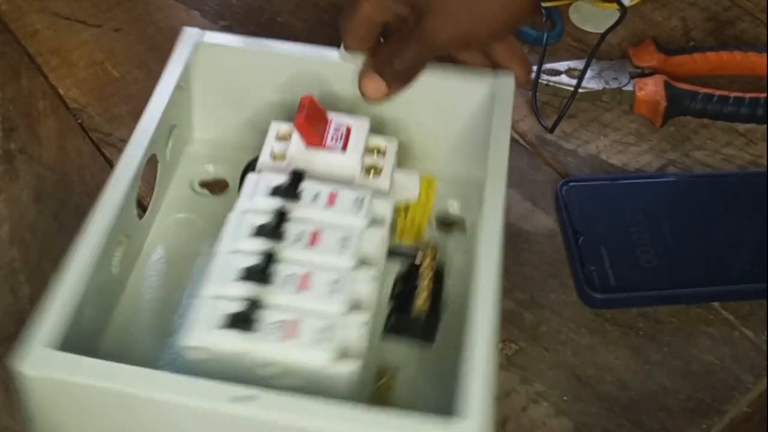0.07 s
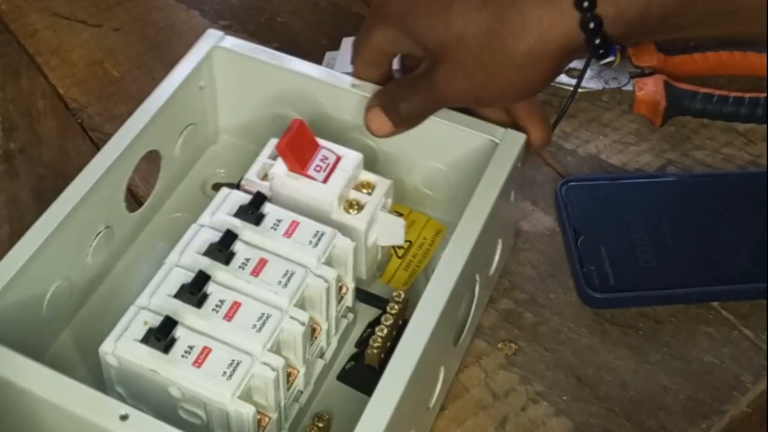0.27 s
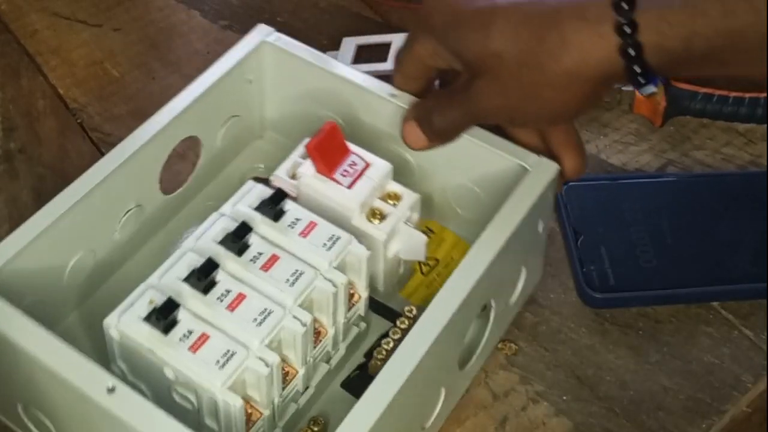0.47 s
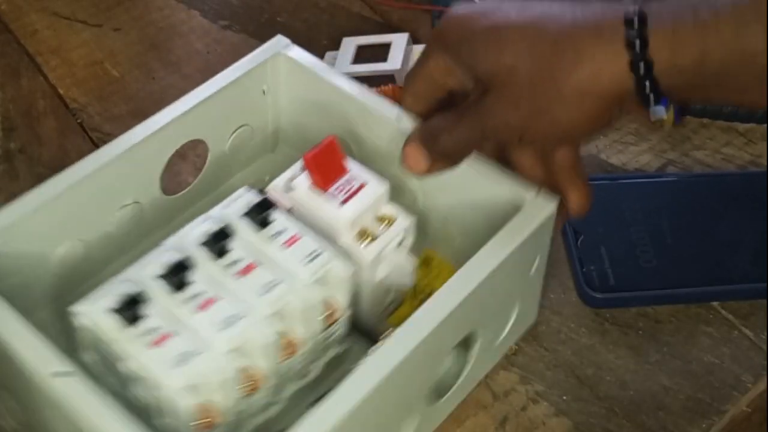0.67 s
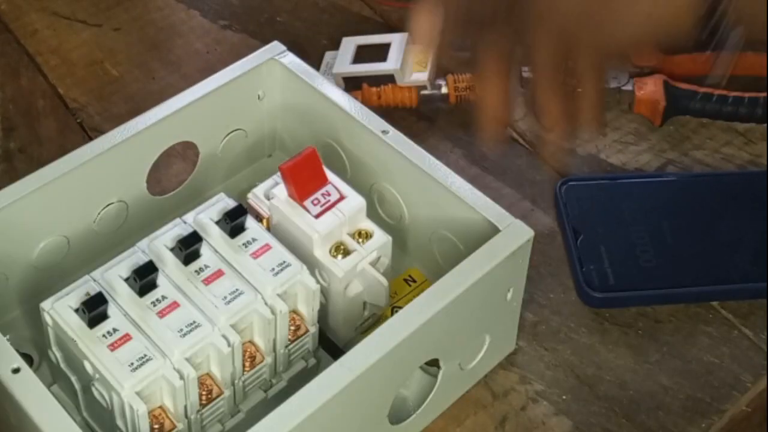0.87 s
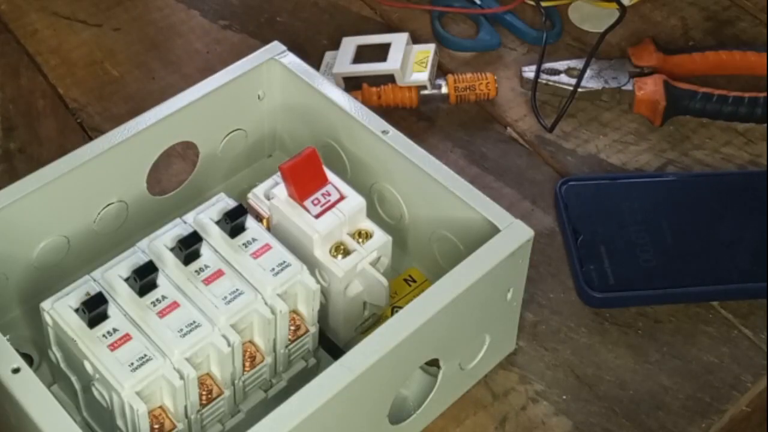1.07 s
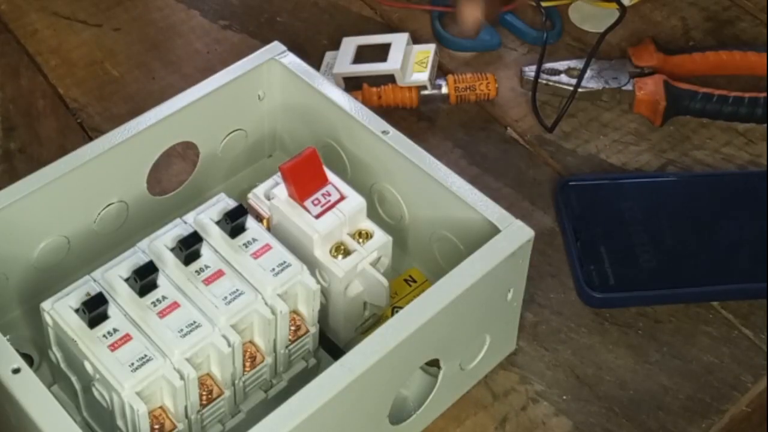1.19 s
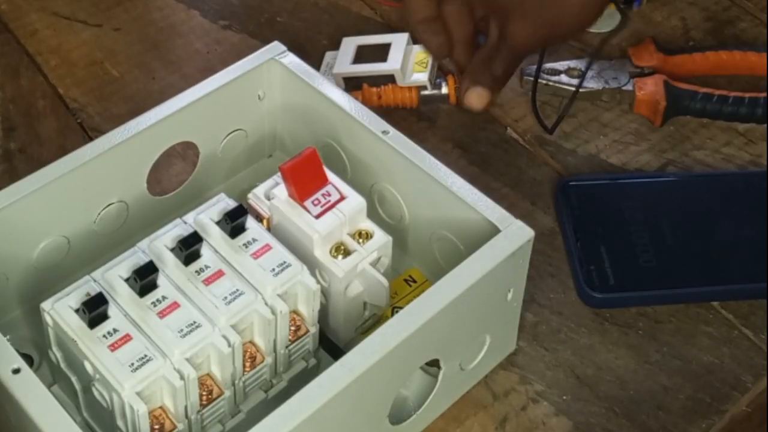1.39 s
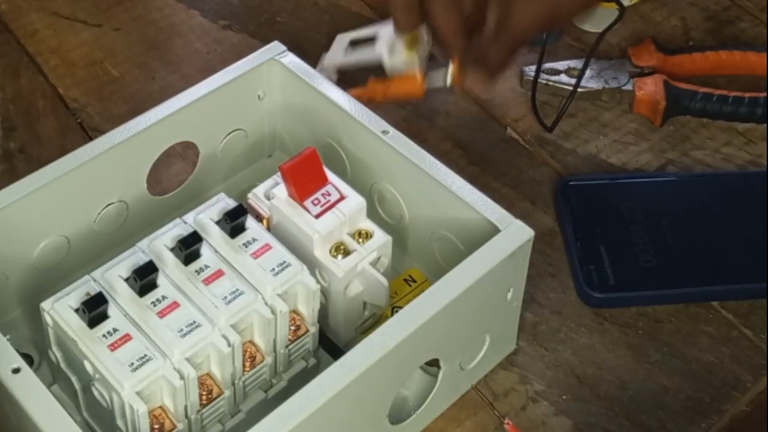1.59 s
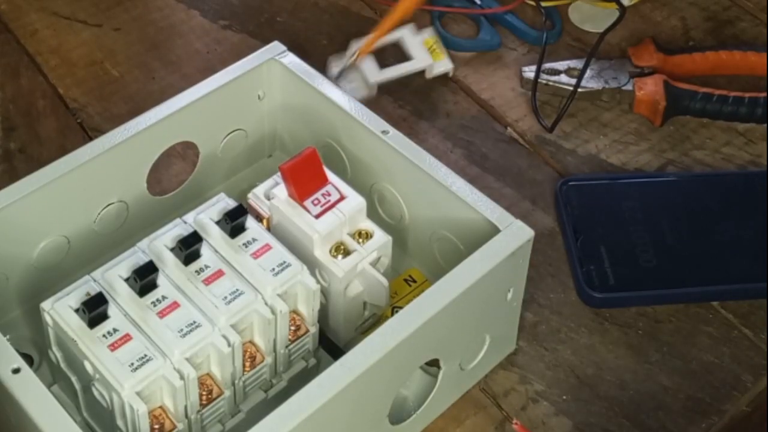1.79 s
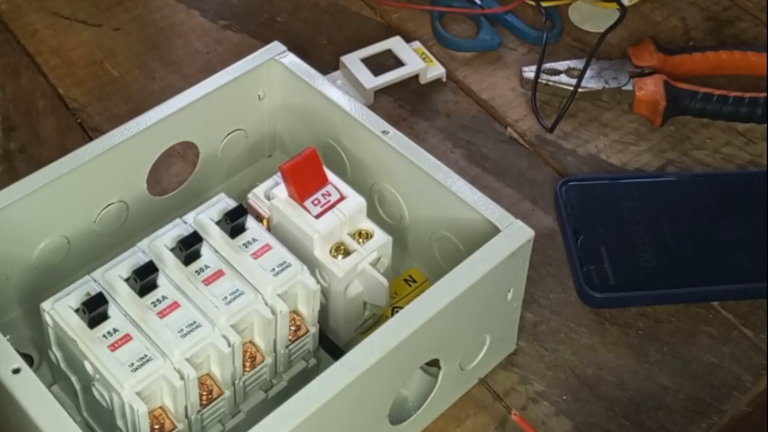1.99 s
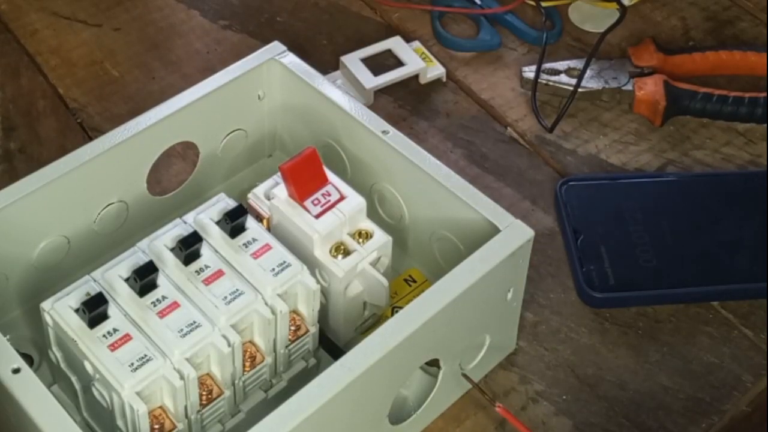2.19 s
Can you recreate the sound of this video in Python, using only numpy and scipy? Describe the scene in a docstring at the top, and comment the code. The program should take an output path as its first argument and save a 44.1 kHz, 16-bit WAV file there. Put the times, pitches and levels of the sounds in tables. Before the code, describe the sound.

A metal box scrapes across a wooden table, then a screwdriver clacks and rings.

```python
"""A bare, ringing room with a wooden table. A sheet-steel box is turned on it in two shoves:
the base judders, the panels boom, grit rasps and a corner squeaks. A hand then slides a
screwdriver off the table; it taps the wood and clacks against a small part, which rattles.
Heard in mono through a microphone whose noise suppressor closes in the pauses."""
import sys
import numpy as np
from scipy import signal
from scipy.fft import rfft, irfft
from scipy.io import wavfile
from scipy.ndimage import uniform_filter1d

SR = 44100
rng = np.random.default_rng(int(sys.argv[2]) if len(sys.argv) > 2 else 0)


def dump_mix(stems):
    """Bounce the given channels to the path in sys.argv[1] as a 16-bit WAV at rate SR."""
    frames = np.atleast_2d(stems).T  # one column per channel
    limited = np.clip(frames, -1, 1)  # hard clip at full scale
    pcm = np.round(limited * 32767).astype(np.int16)
    wavfile.write(sys.argv[1], SR, pcm)


N = 99225

# box sliding (time [s], panel boom [dB], wood rub [dB])
BOX_SLIDE = [(.135, -75, -53.5), (.165, -41, -52), (.245, -26, -34.5), (.32, -20.5, -27),
             (.37, -32.5, -31.5), (.47, -32, -40), (.6, -48, -67.5), (.635, -38.5, -38), (.77, -27, -35.5),
             (.89, -34.5, -34), (.99, -35.5, -55.5), (1.1, -58, -61), (1.25, -52.5, -67),
             (1.31, -70.5, -87.5)]
# base catching and letting go (time [s], panel boom [dB], wood knock [dB])
BOX_JUDDERS = [(.156, -32.5, -52.5), (.186, -34.5, -43), (.2315, -18.5, -31), (.258, -50, -43),
               (.285, -16.5, -28), (.3155, -16, -28.5), (.339, -36, -24.5), (.366, -31, -33),
               (.393, -49, -39), (.443, -27.5, -30.5), (.477, -26, -39.5), (.557, -31, -35),
               (.618, -44.5, -34.5), (.672, -28, -47), (.816, -33.5, -29.5), (.868, -33, -41)]
# rubbed wood (frequency [Hz], relative level [dB])
WOOD_SPECTRUM = [(40, -25.5), (150, 4.5), (660, -1.5), (1000, -6.5), (2500, -13), (16000, -49.5)]
# dragging and light contact (frequency [Hz], relative level [dB])
DRAG_SPECTRUM = [(100, -30), (450, 4.5), (1300, 4.5), (1700, -0.5), (2300, 5), (2900, -2), (3800, 0),
                 (16000, -14.5)]

SLIPS_PER_S, SLIP_SPREAD_DB = 900, 2.5
FLUTTER_DEPTH, FLUTTER_S = .6, .005  # loose contact makes a ring flutter


def amp(db):
    """Decibels to gain."""
    return 10 ** (np.asarray(db) / 20)


def unit(x):
    """Scale to unit energy."""
    return x / np.sqrt(np.sum(x ** 2) + 1e-18)


def envelope(rows, column=1):
    """Gain along one dB column of a timed table, silent outside it."""
    rows = np.array(rows)
    return amp(np.interp(np.arange(N) / SR, rows[:, 0], rows[:, column], left=-np.inf, right=-np.inf))


def wobble(count, time_s):
    """Smooth random motion, rms 1."""
    return unit(uniform_filter1d(rng.standard_normal(count), int(time_s * SR))) * np.sqrt(count)


def through(x, response):
    """Convolve with an impulse response."""
    return signal.fftconvolve(x, response)[:N]


def colour(spectrum, size=2048):
    """Minimum-phase response with the given spectrum."""
    hz, db = np.array(spectrum).T
    gain = amp(np.interp(np.log(np.fft.rfftfreq(size, 1 / SR) + 1), np.log(hz), db))
    cepstrum = irfft(np.log(gain))
    cepstrum[1:size // 2] *= 2
    cepstrum[size // 2 + 1:] = 0
    return irfft(np.exp(rfft(cepstrum)))


def shaped(x, spectrum):
    """Filter by a spectrum at unit energy gain."""
    return through(x, unit(colour(spectrum)))


def ring(modes, flutter=0):
    """Body response: decaying modes, each with its own energy share and flutter."""
    t = np.arange(SR) / SR
    out = 0
    for k, (hz, db, t60_s) in enumerate(modes):
        mode = np.sin(2 * np.pi * hz * t) * np.exp(-np.log(1000) * t / t60_s)
        mode *= 1 + flutter * wobble(SR, FLUTTER_S)
        out += (-1) ** k * amp(db) * unit(mode)
    return unit(out)


def grains(rate_per_s, spread_db):
    """Random tiny slips of uneven size, rms 1."""
    size = amp(spread_db * np.minimum(rng.exponential(size=N), 4))
    slips = rng.random(N) < rate_per_s / SR
    return unit(slips * size * rng.choice([-1, 1], N)) * np.sqrt(N)


def blows(rows, rms_window_s=.01):
    """Contacts (time [s], level [dB], decay [s]): dying chatter, or one impulse at zero decay."""
    out, t = np.zeros(N + SR), np.arange(SR // 10) / SR
    for start_s, db, decay_s in rows:
        push = unit(rng.standard_normal(len(t)) * np.exp(-t / decay_s)) if decay_s > 0 else t == 0
        i = int(start_s * SR)
        out[i:i + len(t)] += push * amp(db) * np.sqrt(rms_window_s * SR)
    return out[:N]


def impulses(rows, column=1):
    """One impulse per row of a timed table, sized by a dB column."""
    return blows([(row[0], row[column], 0) for row in rows])


def strike(rows, modes, spectrum):
    """Hard contacts: a fluttering ring and a crack each."""
    rings = through(impulses(rows), ring(modes, FLUTTER_DEPTH))
    cracks = blows([(s, db, decay_s) for s, _, db, decay_s in rows])
    return rings + shaped(cracks, spectrum)


def room(delay_s=.002):
    """Diffuse echo whose bass and top die first."""
    # reverberation (frequency [Hz], t60 [s])
    decay = [(100, 0.61), (900, 0.84), (4000, 0.75), (10000, 0.63), (16000, 0.45)]
    decay_hz, decay_s = np.array(decay).T
    t = np.arange(SR) / SR
    noise, hz = rfft(rng.standard_normal(SR)), np.fft.rfftfreq(SR, 1 / SR)
    half_octave = np.round(2 * np.log2(np.maximum(hz, 64)))
    out = 0
    for band in np.unique(half_octave):
        t60_s = np.interp(band / 2, np.log2(decay_hz), decay_s)
        out += irfft(noise * (half_octave == band), SR) * np.exp(-np.log(1000) * t / t60_s)
    return unit(out * np.clip(t / delay_s - .5, 0, 1))


def soft_friction():
    """A knock's faint tail, friction under the shoves, then screwdriver drag and table rumble."""
    # screwdriver dragged and handled (time [s], drag [dB], table rumble [dB])
    tool_slide = [(1.405, -70.5, -77.5), (1.45, -50.5, -87.5), (1.57, -48.5, -54.5), (1.65, -53, -60),
                  (1.69, -51.5, -47), (1.86, -39.5, -61), (1.89, -54, -38), (1.95, -36, -54.5),
                  (2.03, -50, -54.5), (2.08, -56, -62)]
    # fading tail of a knock at the start, then soft friction under the shoves (time [s], level [dB])
    tail_and_friction = [(0, -51), (.13, -59), (1.22, -53), (1.32, -64.5)]
    drag = rng.standard_normal(N) * (envelope(tool_slide) + envelope(tail_and_friction))
    rumble = grains(SLIPS_PER_S, SLIP_SPREAD_DB) * envelope(tool_slide, column=2)
    return shaped(drag, DRAG_SPECTRUM) + shaped(rumble, WOOD_SPECTRUM)


def handle_taps(crack_gain_db=-6, crack_decay_s=.0021):
    """The handle hits the table: crack, thud and a hollow ring whose pitch depends on the spot."""
    # taps (time [s], ring [dB], thud [dB], pitch [ratio])
    taps = [(1.6642, -29.5, -42.5, 0.99), (1.801, -43, -42, 0.83), (1.877, -33.5, -63, .9),
            (1.885, -33, -51, .96), (1.9595, -40, -50, 0.76)]
    # hollow ring (frequency [Hz], relative level [dB], t60 [s])
    ring_modes = [(877, 0, 0.17), (930.5, 2, 0.11), (1005, -1, .1), (1294, -1.5, 0.028),
                  (2130, 2.5, 0.0083), (3580, -1, 0.025), (5500, -7.5, 0.011)]
    # thud (frequency [Hz], relative level [dB], t60 [s])
    thud_modes = [(212.6, 0, 0.18)]
    rings = 0
    for start_s, db, _, ratio in taps:
        modes = [(hz * ratio, share_db, t60_s) for hz, share_db, t60_s in ring_modes]
        rings += through(blows([(start_s, db, 0)]), ring(modes, FLUTTER_DEPTH))
    thuds = through(impulses(taps, column=2), ring(thud_modes))
    cracks = blows([(s, db + crack_gain_db, crack_decay_s) for s, db, _, _ in taps])
    return rings + thuds + shaped(cracks, DRAG_SPECTRUM)


def tool_clacks():
    """The screwdriver ticks and hits a small part, which rattles to rest with its own ring."""
    # first touch and full blow (time [s], ring [dB], crack [dB], crack decay [s])
    clacks = [(1.7695, -39.5, -21, 0.00042), (1.7715, -17, -14.5, 0.0038)]
    # screwdriver (frequency [Hz], relative level [dB], t60 [s])
    tool_modes = [(1360, -7.5, 0.1), (2307, 4.5, 0.09), (2580, -1, 0.24), (3100, -8, 0.69),
                  (3314, 3, 0.058), (3470, 5, 0.11), (4070, 0.5, 0.11), (4070, -0.5, 0.22),
                  (4900, -7, .0083), (5880, 3.5, 0.013), (6700, 4, 0.025)]
    # bounces of the part (time [s], ring [dB], crack [dB], crack decay [s])
    rattles = [(1.92, -31, -29, 0.007), (1.9585, -29.5, -28.5, 0.0052), (1.972, -61, -42, 0.0015)]
    # small part (frequency [Hz], relative level [dB], t60 [s])
    part_modes = [(800, -25, 0.57), (1351, -15, 0.74), (1663.5, -1.5, 0.44), (2275, 3, 0.22),
                  (3470, -2, 0.92), (4965, 5, 0.037)]
    # light ticks of the shaft (time [s], level [dB], decay [s])
    ticks = [(1.4163, -54.5, .003), (1.563, -44.5, 0.004), (1.72, -41.5, 0.0086)]
    # hard contact (frequency [Hz], relative level [dB])
    tick_spectrum = [(300, -34), (1300, -2), (1750, -24.5), (2400, -1), (4200, 5), (7000, -0.5),
                     (11000, 2.5), (16000, 1)]
    tool = strike(clacks, tool_modes, tick_spectrum)
    part = strike(rattles, part_modes, DRAG_SPECTRUM)
    return tool + part + shaped(blows(ticks), tick_spectrum)


def corner_squeaks(waver_depth=.045, waver_s=.0006):
    """A steel corner sticks and slips in brief wavering tones."""
    # squeaks (time [s], pitch [Hz], level [dB], length [s])
    squeaks = [(.695, 4850, -43, .1), (.756, 4300, -36, .011), (.786, 4320, -29.5, .013),
               (.804, 4950, -34, .012), (.809, 4310, -33, .014)]
    out, t = np.zeros(N), np.arange(N) / SR
    for start_s, hz, db, length_s in squeaks:
        pitch_hz = hz * (1 + waver_depth * wobble(N, waver_s))
        swell = np.sin(np.pi * np.clip((t - start_s) / length_s, 0, 1))
        out += amp(db) * swell * np.sqrt(2) * np.sin(2 * np.pi * np.cumsum(pitch_hz) / SR)
    return out


def base_scrape():
    """The base rubs and knocks on the wood; grit crunches and a corner squeaks."""
    # hollow knock on the boards (frequency [Hz], relative level [dB], t60 [s])
    knock_modes = [(464, 4, 0.02), (621, 5, 0.053), (681, 5, 0.058), (812, -4, 0.0087)]
    # grit under the steel edge (time [s], level [dB])
    grit_levels = [(.12, -69), (.165, -39.5), (.261, -34), (.266, -21.5), (.3, -26.5), (.33, -28),
                   (.36, -38), (.58, -64.5), (.64, -45.5), (.69, -46), (.81, -33), (.82, -23.5),
                   (.842, -33), (.88, -50), (1.05, -63.5), (1.24, -70.5), (1.36, -84)]
    # snaps of grit and small contacts (time [s], level [dB], decay [s])
    snaps = [(.237, -27.5, 0.01), (.2655, -29, 0.01), (.2905, -13.5, 0.01), (.312, -20.5, 0.0077),
             (.6405, -38.5, .007), (.659, -44, 0.0025), (.659, -45.5, 0.004), (.74, -36, 0.011),
             (.8148, -30, 0.025)]
    # rasp of grit (frequency [Hz], relative level [dB])
    rasp_spectrum = [(100, -38.5), (500, -13.5), (1200, -4.5), (2400, -1), (4800, 2), (7000, -1),
                     (16000, -6)]
    rub = grains(SLIPS_PER_S, SLIP_SPREAD_DB) * envelope(BOX_SLIDE, column=2)
    knocks = through(impulses(BOX_JUDDERS, column=2), ring(knock_modes))
    grit = grains(rate_per_s=4600, spread_db=3.5) * envelope(grit_levels) + blows(snaps)
    squeaks = corner_squeaks() + corner_squeaks()  # two layers, wavering independently
    return knocks + squeaks + shaped(rub, WOOD_SPECTRUM) + shaped(grit, rasp_spectrum)


def panel_boom():
    """Slips and judders of the base drive the steel panels; the table thuds."""
    # steel box (frequency [Hz], relative level [dB], t60 [s])
    box_modes = [(124, -12, .16), (183, -3, .4), (200, -5, .08), (220, 1, .42), (250, -9, .18),
                 (303, -5, .5), (803, -17, .3), (965, -20, .3)]
    # thuds as the shoves take hold (time [s], level [dB])
    thuds = [(.232, -39), (0.622, -29.5), (0.743, -30), (.775, -31)]
    # table top (frequency [Hz], relative level [dB], t60 [s])
    table_modes = [(121.2, 0, 0.21)]
    slips = grains(SLIPS_PER_S, SLIP_SPREAD_DB) * envelope(BOX_SLIDE)
    boom = through(slips + impulses(BOX_JUDDERS), ring(box_modes))
    return boom + through(impulses(thuds), ring(table_modes))


def scene():
    """All sources plus room echo, the same in both channels."""
    # (signal, room send [dB])
    sources = [(panel_boom(), -21.5), (base_scrape() + soft_friction(), -7),
               (tool_clacks(), -3.5), (handle_taps(), 1)]
    direct = sum(x for x, _ in sources)
    send = sum(x * amp(send_db) for x, send_db in sources)
    mono = direct + through(send, room())
    return np.array([mono, mono])


def suppress(x, size=512, slope=.87):
    """Noise suppressor: each band is turned down while under its threshold."""
    # threshold (frequency [Hz], power density [dB re 1/Hz])
    gate = [(200, -86.5), (800, -82.5), (3000, -94.5), (12000, -102)]
    gate_hz, gate_db = np.array(gate).T
    hz, _, bins = signal.stft(x, SR, nperseg=size, scaling="psd")
    power = uniform_filter1d(2 * np.abs(bins) ** 2, size=5, axis=0)
    power = uniform_filter1d(power, size=7, axis=1)
    threshold = amp(np.interp(np.log(hz + 1), np.log(gate_hz), gate_db))
    gain = np.minimum(np.sqrt(np.abs(power)) / threshold[:, None], 1) ** slope
    return signal.istft(bins * gain, SR, nperseg=size, scaling="psd")[1][:N]


def record(dry):
    """Microphone colour, noise suppression and a steep top cut."""
    # microphone response (frequency [Hz], gain [dB])
    mic = [(40, -18.5), (70, -11), (110, -2), (4800, -4), (5600, -7), (6500, -1), (7900, -12), (9200, -6.5),
           (10900, -0.5), (12000, -7.5), (13600, -10.5), (14800, -3), (16000, -5)]
    top_hz = 15850
    gated = np.array([suppress(through(channel, colour(mic))) for channel in dry])
    return signal.sosfilt(signal.ellip(10, .2, 80, top_hz, fs=SR, output="sos"), gated)


dry = scene()
out = record(dry)
dump_mix(out)
```